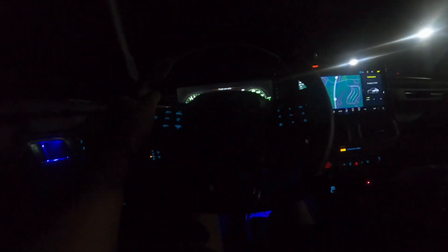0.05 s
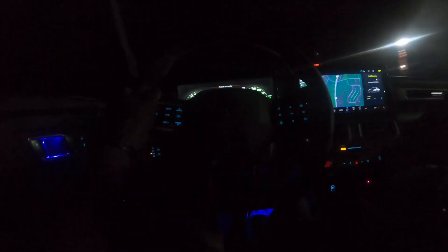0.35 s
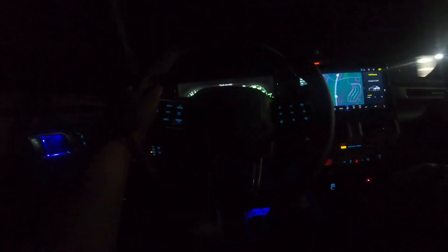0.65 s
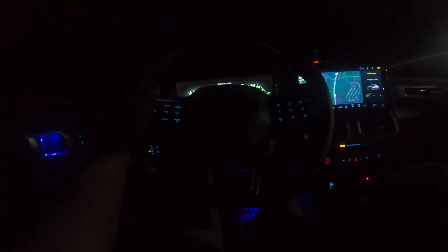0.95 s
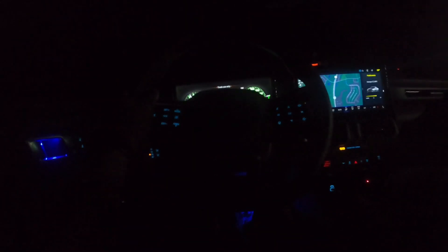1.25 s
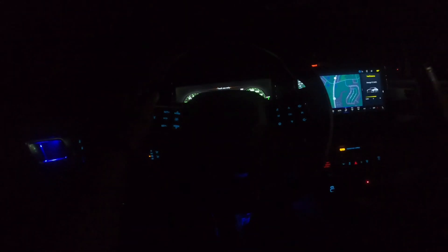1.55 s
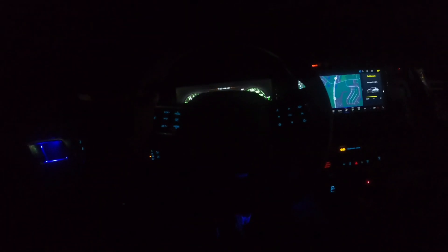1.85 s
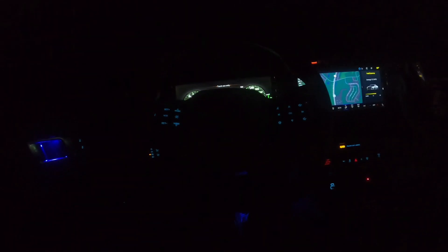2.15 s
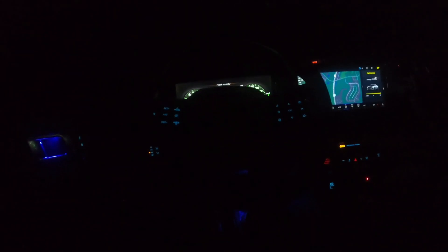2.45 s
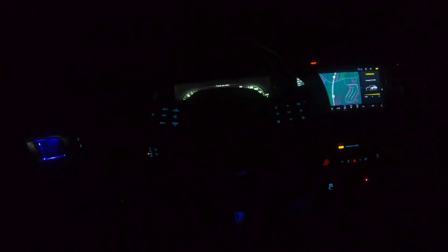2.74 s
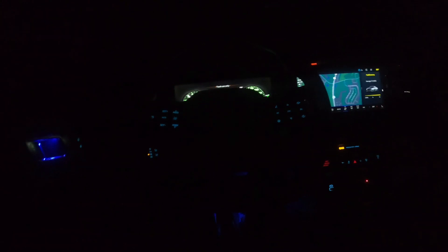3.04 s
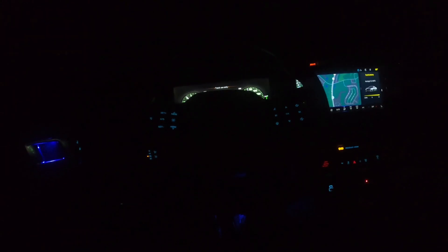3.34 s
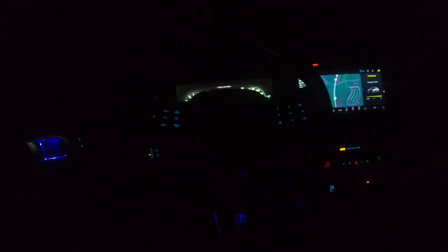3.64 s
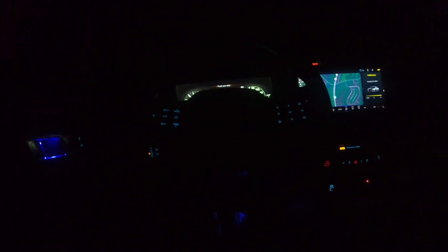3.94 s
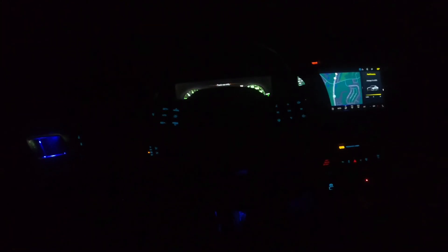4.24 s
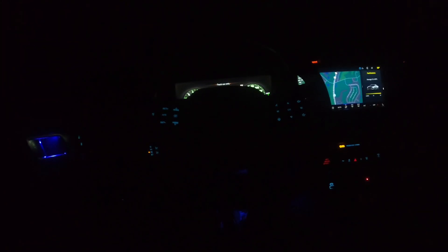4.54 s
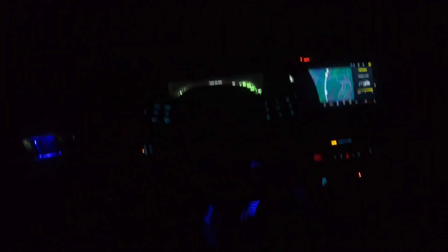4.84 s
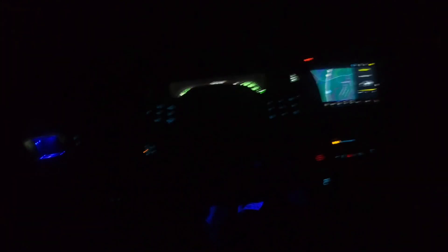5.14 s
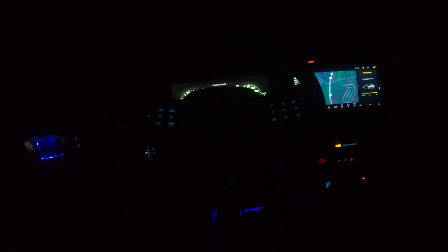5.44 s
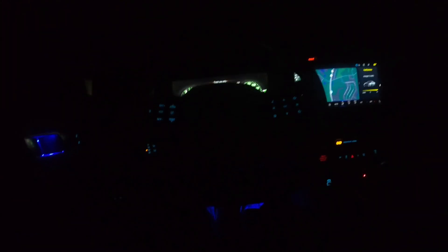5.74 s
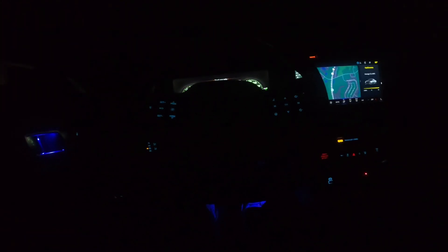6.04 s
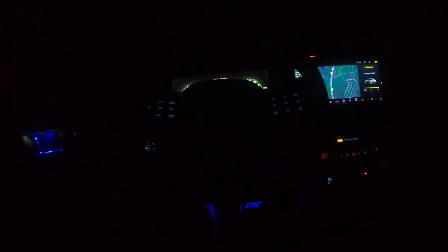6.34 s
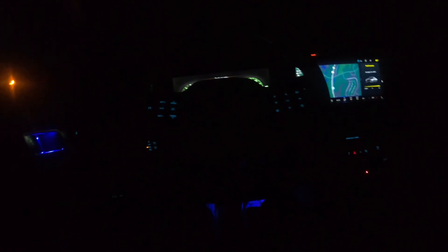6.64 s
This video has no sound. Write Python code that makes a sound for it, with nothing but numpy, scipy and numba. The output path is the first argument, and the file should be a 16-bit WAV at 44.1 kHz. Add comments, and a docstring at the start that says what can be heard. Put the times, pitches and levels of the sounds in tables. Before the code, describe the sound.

Inside a fast car, a V8 coasts under heavy wind buffeting, barks once on a downshift, then starts pulling again.

```python
"""Inside a V8 car at speed at night. A wide rush of air and puffs of wind on the microphone open the
scene and die away in about a second. The engine coasts, its orders booming in the cabin, under heavy
wind buffeting and tyre roar; loose trim rattles now and then. At five seconds the downshift knocks
and a throttle blip makes the exhaust thump and bark once. From six seconds the engine pulls
again at higher revs, intake roaring. Throughout, the phone's limiter holds the peaks."""
import sys
import numpy as np
from scipy import signal
from scipy.fft import rfft, irfft, next_fast_len
from scipy.io import wavfile
from scipy.ndimage import uniform_filter1d, minimum_filter1d
from numba import njit

SR = 44100
rng = np.random.default_rng(int(sys.argv[2]) if len(sys.argv) > 2 else 0)


def inscribe(sig):
    """Save sig as 16-bit PCM at rate SR to the path in sys.argv[1].

    A 1-D sig is mono; a 2-D sig holds one channel per row.
    Samples are clipped to [-1, 1] before scaling.
    """
    pcm = np.round(np.clip(np.atleast_2d(sig).T, -1, 1) * 32767)
    wavfile.write(sys.argv[1], SR, pcm.astype(np.int16))


N = 295029


# Rev curve: coast, blip, pull; a cycle is two crank turns, eight firings (time [s], cycle rate [Hz])
REVS = [(0, 28.4), (.7, 28.2), (1.5, 27.6), (2.5, 27.03), (3.2, 26.4), (4.0, 25.7), (4.65, 25.25),
        (4.85, 24.1), (5.0, 22.4), (5.09, 22.8), (5.18, 28), (5.28, 30.8), (5.38, 31), (5.58, 28),
        (5.72, 26.8), (5.9, 27.2), (6.08, 28.1), (6.22, 30.1), (6.33, 31.7), (6.44, 34.3), (6.52, 34.7),
        (6.69, 33.7)]
# Boom ride, fullest under engine braking and at the top of the blip (time [s], gain [dB])
BOOM_RIDE = [(.3, -8), (1.0, -.5), (2.1, 0), (2.4, -3), (3.5, -2), (4.0, 1), (4.7, 1.5), (4.95, 5),
             (5.05, 3.5), (5.15, -2), (5.225, 7.5), (5.29, 7.5), (5.36, 1.5), (6.0, 2.5), (6.3, -1),
             (6.5, 2.5)]
def engine(coast_bark_db=-42):
    """Drone, exhaust and intake share the crankshaft; the bark takes over as the throttle snaps open."""
    cycle_hz, = curves(REVS)
    load, bark_db, press_boom_db = throttle()
    cycles = np.cumsum(cycle_hz) / SR
    boom_db = curves(BOOM_RIDE)[0] + press_boom_db
    exhaust = undb(coast_bark_db + bark_db) * (bark(cycles) + rasp(cycles))
    return drone(cycles, cycle_hz, load, boom_db) + exhaust + intake(cycles, cycle_hz)


# Pedal moves: a touch, the downshift blip, the clutch taking up, the pull
# (start [s], rise [s], hold [s], load [0-1], bark gain [dB], boom gain [dB])
PRESSES = [(0.817, 0.11, 0.13, 0.66, -1, 2.5), (5.035, 0.13, 0.105, 0.97, 23.5, 1),
           (5.302, 0.091, 0.31, 0.2, 3.5, 0), (6.114, 0.28, .5, 0.96, 6, -1.5)]
def throttle(lift_s=0.12):
    """Each press rises, holds and lifts; gives the engine load and the gains of bark and boom in dB."""
    total = 0
    for start_s, rise_s, hold_s, *effects in PRESSES:
        pedal = ramp(start_s, rise_s) - ramp(start_s + rise_s + hold_s, lift_s)
        total = total + np.outer(effects, pedal)
    load, bark_db, boom_db = total
    return np.clip(load, 0, 1), bark_db, boom_db


# The two orders that boom (order [x cycle rate], coasting base level [dB], pulling base level [dB])
BOOM_ORDERS = [(5, -28.5, -11.2), (6, -19.8, -28)]
# Partials of the uneven firing (order [x cycle rate], coasting level [dB], pulling level [dB])
FIRING_ORDERS = [(2, -25, -27.5), (3, -23, -25.5), (4, -35, -20.5), (7, -35, -31.5), (8, -30, -34.5),
                 (9, -37.5, -34), (10, -35, -38), (11, -40, -35.5), (12, -41.5, -34.5), (14, -45, -38),
                 (15, -46, -34.5), (16, -52.5, -42)]
def drone(cycles, cycle_hz, load, boom_db, waver_db=1.0, mode_hz=160, mode_width_hz=42):
    """Engine orders; the cabin booms on the sixth coasting, the fifth pulling, most near its air mode."""
    out = 0
    for orders, booms in ((BOOM_ORDERS, True), (FIRING_ORDERS, False)):
        for order, coast_db, pull_db in orders:
            db = coast_db + load * (pull_db - coast_db) + waver_db * walk(7.2)
            if booms:
                detune = 2 * (order * cycle_hz - mode_hz) / mode_width_hz
                db = db + boom_db - 10 * np.log10(1 + detune ** 2)
            out = out + undb(db) * np.sin(2 * np.pi * (np.round(order) * cycles + rng.random()))
    return out


# Accents of the eight firings, two banks heard unequally (relative level [dB])
CYLINDERS = [-2.5, -20, -5, -4.5, -19.5, -5, -0.5, -16]
# The exhaust muffled by the body (frequency [Hz], relative level [dB])
EXHAUST_EQ = [(40, -35), (105, -22), (150, -7), (190, 5), (270, -3), (340, -15), (520, -22), (700, -35),
              (1200, -45), (2500, -62), (8000, -95)]
def bark(cycles, scatter_db=-1.5, gas=0.046, gas_decay_strokes=1.0):
    """Eight uneven firings a cycle, each followed by a puff of gas, sound through the exhaust."""
    strokes = np.maximum(cycles * len(CYLINDERS) + .12 * walk(150), 0)  # loose timing adds grit
    firing = np.maximum.accumulate(np.floor(strokes).astype(int))
    count = firing[-1] + 1
    accent = undb(np.resize(CYLINDERS, count) + scatter_db * rng.standard_normal(count))[firing]
    pulses = np.diff(firing, prepend=0)
    puffs = gas * np.exp(-(strokes % 1) / gas_decay_strokes) * rng.standard_normal(N)
    return colour(accent * (pulses + puffs), EXHAUST_EQ)


# Tailpipe rings that roughen the bark (frequency [Hz], width [Hz], relative level [dB])
TAILPIPE_MODES = [(150, 18, -6), (183, 28, 1), (223, 26, -4), (275, 18, -5.5), (336, 24, -12),
                  (425, 36, -14), (530, 100, -16)]
def rasp(cycles, throb=1.0):
    """Gas tears through the tailpipes, surging once a crank turn."""
    surge = 1 + throb * np.cos(2 * np.pi * 2 * cycles)
    return surge * resonances(TAILPIPE_MODES)


# Midrange growl through the bulkhead (frequency [Hz], relative level [dB])
INTAKE_EQ = [(200, -31.5), (450, -7.5), (800, 2.5), (1050, -4), (1250, -7.5), (1550, -8), (1900, -15.5),
             (5000, -41), (12000, -72)]
def intake(cycles, cycle_hz, roar_db=-33.5, full_hz=34, steepness=3.7, throb=0.17, early_db=-9):
    """Air gulped once a firing; the roar grows with the revs and swells just ahead of the pull."""
    gulps = 1 + throb * np.cos(2 * np.pi * cycles * len(CYLINDERS))
    early = 1 - ramp(start_s=5.6, length_s=0.38)
    gain = undb(roar_db + early_db * early) * (cycle_hz / full_hz) ** steepness
    return gain * colour(gulps * rng.standard_normal(N), INTAKE_EQ)


# Low thumps: knocks at the gear change and exhaust thumps as the throttle snaps open
# (time [s], level [dB], pitch [Hz], decay [s])
THUMPS = [(4.955, -14.5, 220, 0.024), (5.096, -13, 199, 0.023), (5.161, -4.5, 199, 0.033),
          (6.257, -10, 137, .035)]
def thumps(attack_s=0.0035, overtone_ratio=1.45, overtone_db=-6.5):
    """Each thump is a short low tone with an overtone that dies sooner."""
    out = 0
    for start_s, db, hz, decay_s in THUMPS:
        age = since(start_s)
        phase = 2 * np.pi * hz * age
        tail = np.exp(-age / decay_s)
        ring = np.sin(phase) + undb(overtone_db) * np.sin(overtone_ratio * phase) * tail
        out = out + undb(db) * ramp(start_s, attack_s) * tail * ring
    return out


# Sub rumble of the cabin's air modes (frequency [Hz], width [Hz], relative level [dB])
AIR_MODES = [(16.4, 6.7, -22.5), (27.7, 13.3, -12), (37.75, 14.3, -14.5), (53.8, 20.2, -22),
             (80.3, 26.4, -27.5)]
# Breathers in the buffeting (start [s], length [s], gain [dB])
LULLS = [(0.383, 0.24, -1.5), (1.64, 0.27, -2.5), (2.897, 0.31, -2), (4.8, 0.26, -2), (6.397, 0.57, -1.5)]
def buffeting(evenness=0.56, gain_db=1.02, gust_db=0.48, gusts_per_s=9, swing_s=0.046):
    """Wind pumps the cabin air in random gusts; strong swings are damped more than weak ones."""
    air = resonances(AIR_MODES)
    power = uniform_filter1d(air ** 2, int(SR * swing_s))
    damping = (power / power.mean()) ** (-evenness / 2)
    lull_db = sum(db * swell(s, length) for s, length, db in LULLS)
    return air * damping * undb(gain_db + lull_db + gust_db * walk(gusts_per_s))


# Dark bed of tyre and wind roar (frequency [Hz], relative level [dB])
ROAD_EQ = [(20, -23.5), (60, -8.5), (110, -4), (180, -4), (270, -5), (370, -10), (560, -11.5), (720, -16),
           (1000, -17.5), (1200, -20.5), (1550, -23), (1800, -32), (3000, -54.5), (8000, -83.5)]
# Bright hiss at the window seals (frequency [Hz], relative level [dB])
SEAL_EQ = [(500, -14), (1300, -5), (2000, 1.5), (2600, -0.5), (3200, -1), (4200, -7), (5200, -16),
           (7000, -21.5), (8000, -28), (9300, -24), (12000, -34), (15000, -44.5)]
# Coarser and smoother stretches of road (start [s], length [s], roar gain [dB], hiss gain [dB])
ROAD_PATCHES = [(.95, 1.1, 0.5, -0.5), (2.95, 0.5, 1.5, 1.5), (5.204, 0.63, -1, -0.8), (5.85, 1.04, 2, 1.5)]
def road_and_wind(roar_db=-25, hiss_db=-41, road_flicker_db=0.56, wind_flicker_db=0.77):
    """Tyres roar through the floor, more on coarse road; the seals hiss, easing as the car slows."""
    coarse_db = sum(db * swell(s, length) for s, length, db, _ in ROAD_PATCHES)
    hiss_ride_db = sum(db * swell(s, length) for s, length, _, db in ROAD_PATCHES)
    hiss_ride_db -= 0.49 * since(0)  # sag in dB per second
    tyres = noise(ROAD_EQ) * undb(roar_db + coarse_db + road_flicker_db * walk(14))
    seals = noise(SEAL_EQ) * undb(hiss_db + hiss_ride_db + wind_flicker_db * walk(40))
    return tyres + seals


# Hum of the body panels (frequency [Hz], width [Hz], level [dB])
PANEL_MODES = [(131.9, 26.6, -24.5), (198, 36, -29), (603.5, 70, -41)]
def panels():
    """The body hums at its resonances, shaken by the road and the airstream."""
    return resonances(PANEL_MODES)


# The opening whoosh of air (frequency [Hz], relative level [dB])
RUSH_EQ = [(100, -2), (400, 7.5), (700, 0), (1100, 6), (1800, 3.5), (3400, 2), (4500, -1.5), (5500, -12),
           (10000, -25), (15000, -50)]
def side_rush(level_db=-31, left_db=2.0, shared=0.65, flutter_db=0.8):
    """Fluttering air rushes by, only partly alike at the two ears and stronger on the left."""
    common = shared * rng.standard_normal(N)
    ears = [colour(common + rng.standard_normal(N), RUSH_EQ) * undb(side * left_db) for side in (1, -1)]
    return np.array(ears) * undb(level_db + rush_fade() + flutter_db * walk(50))


# Bass-heavy bluster of the eddies (frequency [Hz], relative level [dB])
EDDY_EQ = [(15, 1.5), (50, 1), (100, -7.5), (300, -10.5), (600, -25), (1000, -25.5), (3000, -65),
           (10000, -96)]
def port_eddies(level_db=-29.5, puff_db=13, left_db=-1.5, flutter_db=5.0):
    """Wind flutters on each microphone port separately, puffs hard once and fades with the rush."""
    eddy_db = level_db + rush_fade() + puff_db * swell(start_s=0.3, length_s=0.44)
    return np.array([noise(EDDY_EQ) * undb(eddy_db + side * left_db + flutter_db * walk(35))
                     for side in (1, -1)])


def rush_fade(hold_s=0.47, db_per_s=33.5):
    """The side wind holds, then dies away evenly; in dB."""
    return -db_per_s * since(hold_s)


# Small ticks of loose trim (time [s], level [dB], frequency [Hz], decay [s])
RATTLES = [(.9, -35, 2100, .014), (2.378, -38, 1790, 0.043), (3.698, -43, 2480, .022),
           (4.953, -37, 2610, 0.013), (5.16, -45, 3170, 0.053), (6.233, -39, 1600, 0.018)]
def trim_rattles(width_hz=650, attack_s=0.0032):
    """Each jolt sets a piece of trim buzzing; it soon dies away."""
    return sum(undb(db) * ramp(s, attack_s) * np.exp(-since(s) / decay_s) * resonance(hz, width_hz)
               for s, db, hz, decay_s in RATTLES)


# Bell EQ of the glass and trim (frequency [Hz], width [Hz], gain [dB])
CABIN_EQ = [(105, 35, -1.5), (165, 50, -3), (235, 22, -3), (1035, 70, 2), (1165, 70, -2.5), (1240, 60, 2),
            (1520, 120, 1.5), (1805, 60, 2.5), (2240, 110, 2), (2440, 60, 2.5), (2720, 80, -2),
            (2805, 60, 3), (2955, 70, 4), (3220, 110, 3), (4000, 70, 2.5), (4540, 130, 2), (12300, 900, 4)]
def cabin(x, gain_db=-0.5):
    """Glass and trim colour a sound with narrow peaks and dips."""
    size = next_fast_len(N + 8192)
    f = np.arange(size // 2 + 1) * SR / size
    peaks_db = sum(db * np.exp(-(2 * (f - hz) / width) ** 2) for hz, width, db in CABIN_EQ)
    return irfft(rfft(x, size) * undb(gain_db + peaks_db), size)[..., :N]


def undb(db):
    """Decibels to gain."""
    return 10 ** (np.asarray(db) / 20)


def unit(x):
    """Scale to rms 1."""
    return x / np.sqrt(np.mean(x ** 2))


def curves(table):
    """Each column of a time table as automation, one value per sample."""
    times, *columns = np.transpose(table)
    return [np.interp(np.arange(N) / SR, times, column) for column in columns]


def since(start_s):
    """Seconds since a cue; 0 before it."""
    return np.maximum(np.arange(N) / SR - start_s, 0)


def ramp(start_s, length_s):
    """Rises evenly from 0 to 1, then stays."""
    return np.minimum(since(start_s) / max(length_s, 1 / SR), 1)


def swell(start_s, length_s):
    """One smooth hump from 0 to 1 and back."""
    return np.sin(np.pi * ramp(start_s, length_s))


def walk(rate):
    """Random levels held 1 / rate s and slewed twice; rms 1."""
    hold = int(SR / rate)
    steps = np.repeat(rng.standard_normal(N // hold + 1), hold)
    return unit(uniform_filter1d(uniform_filter1d(steps, hold), hold)[:N])


def colour(x, eq):
    """Filter by an EQ curve of (frequency [Hz], level [dB]) points; rms 1."""
    size = next_fast_len(N + 8192)
    hz, db = np.transpose(eq)
    f = np.maximum(np.arange(size // 2 + 1) * SR / size, 1)
    response = undb(np.interp(np.log(f), np.log(hz), db))
    return unit(irfft(rfft(x, size) * response, size)[:N])


def noise(eq):
    """White noise through an EQ curve; rms 1."""
    return colour(rng.standard_normal(N), eq)


def resonance(hz, width_hz):
    """A steep resonance kept ringing by turbulence; rms 1."""
    size = next_fast_len(N)
    f = np.maximum(np.arange(size // 2 + 1) * SR / size, 1)
    response = 1 / (1 + 1j * (f / hz - hz / f) * hz / width_hz / 2 ** .5) ** 2
    return unit(irfft(rfft(rng.standard_normal(size)) * response, size)[:N])


def resonances(modes):
    """A stack of noise-driven resonances."""
    return sum(undb(db) * resonance(hz, width) for hz, width, db in modes)


@njit
def follow_peaks(x, release):
    """Envelope that jumps to each peak and falls slowly."""
    out, level = np.empty(len(x)), 0.
    for i in range(len(x)):
        level = max(x[i], level * (1 - release))
        out[i] = level
    return out


def scene():
    """The car sits in the middle; only the moving air is wide."""
    car = engine() + thumps() + buffeting() + panels() + trim_rattles()
    return car + cabin(road_and_wind() + side_rush()) + port_eddies()


def record(dry, release_s=0.006, ceiling=1.03, top_hz=15600):
    """The phone's look-ahead limiter holds the peaks; the tips clip with a faint tick; the top is cut."""
    envelope = follow_peaks(np.abs(dry).max(axis=0), 1 / (release_s * SR))
    gain = np.minimum(1, ceiling / envelope)
    gain = uniform_filter1d(minimum_filter1d(gain, size=128), size=128)  # ducks just before each peak
    held = np.clip(dry * gain, -1, 1) * ramp(0, .003)
    return signal.sosfilt(signal.ellip(8, .2, 70, top_hz, fs=SR, output="sos"), held)


dry = scene()
out = record(dry)
inscribe(out)
```